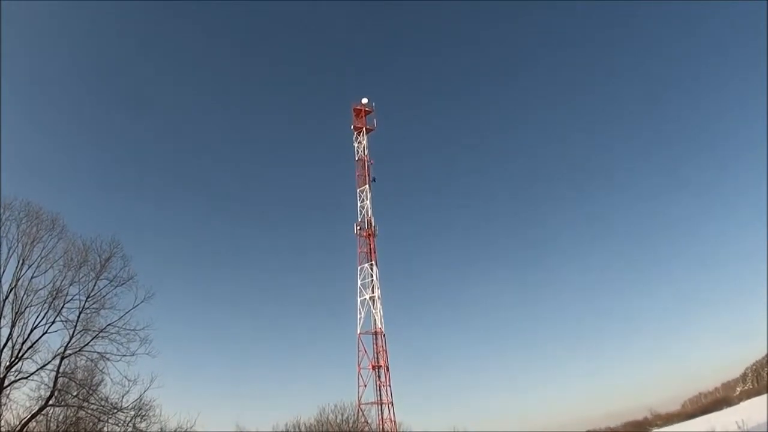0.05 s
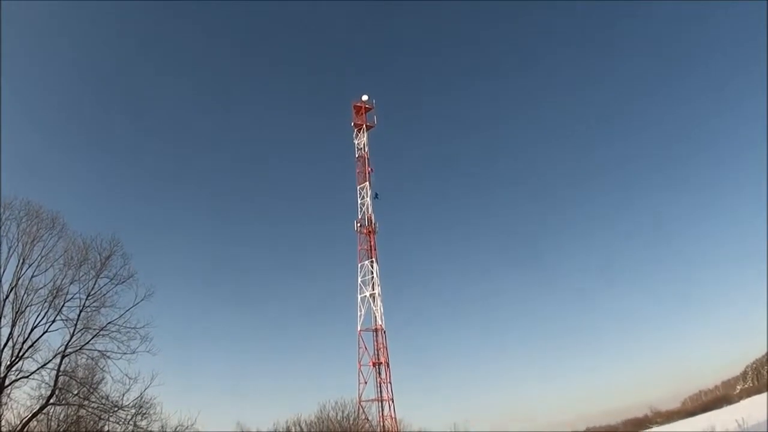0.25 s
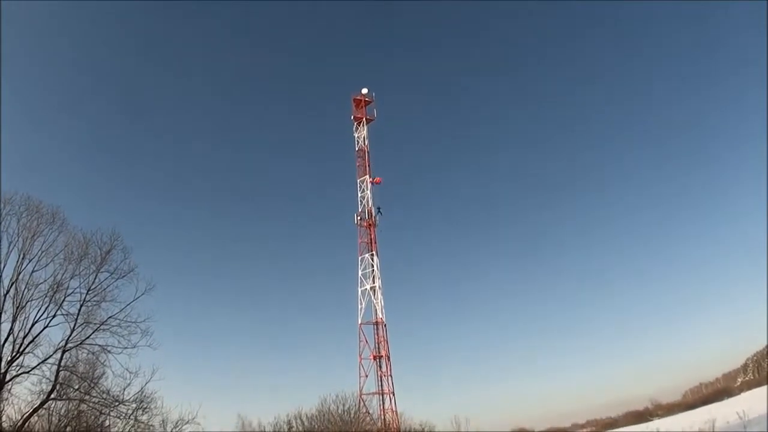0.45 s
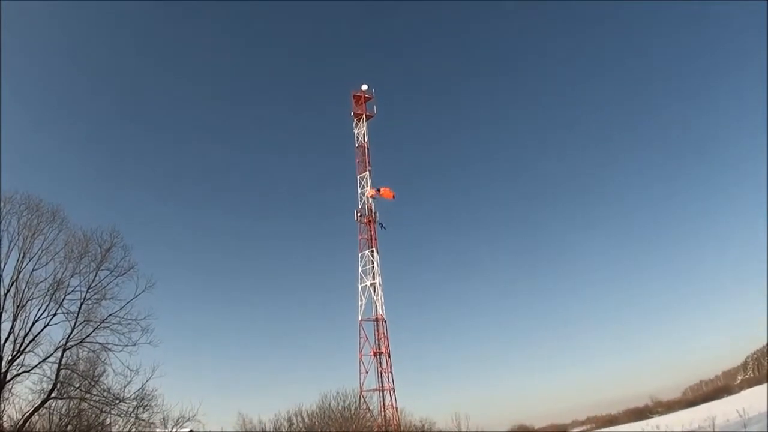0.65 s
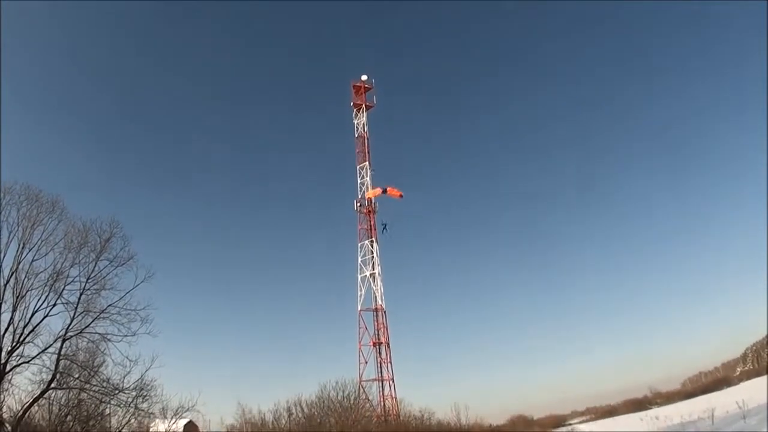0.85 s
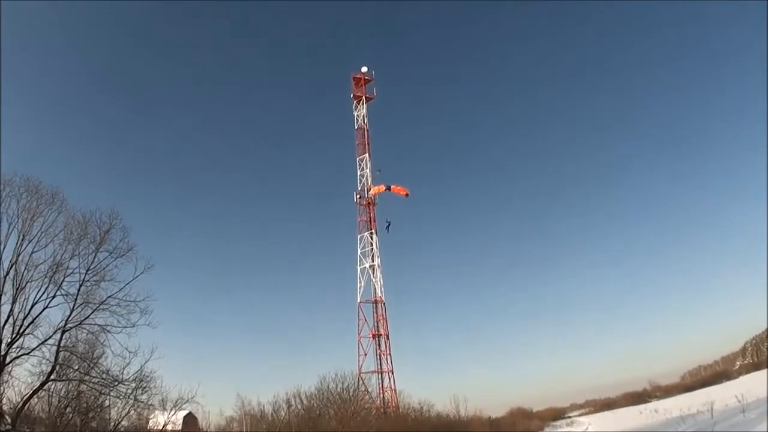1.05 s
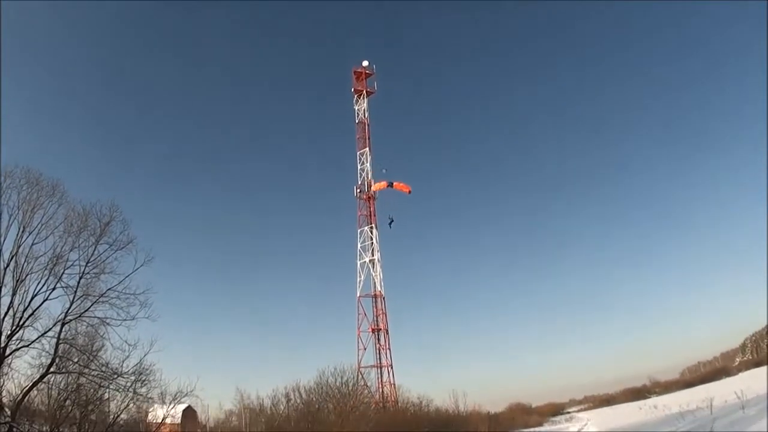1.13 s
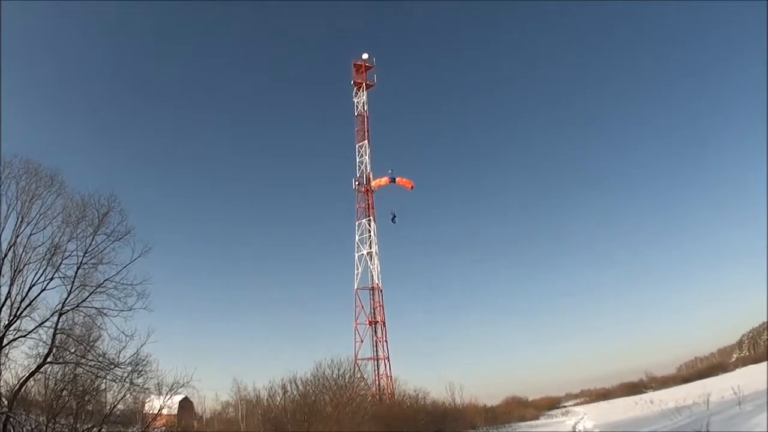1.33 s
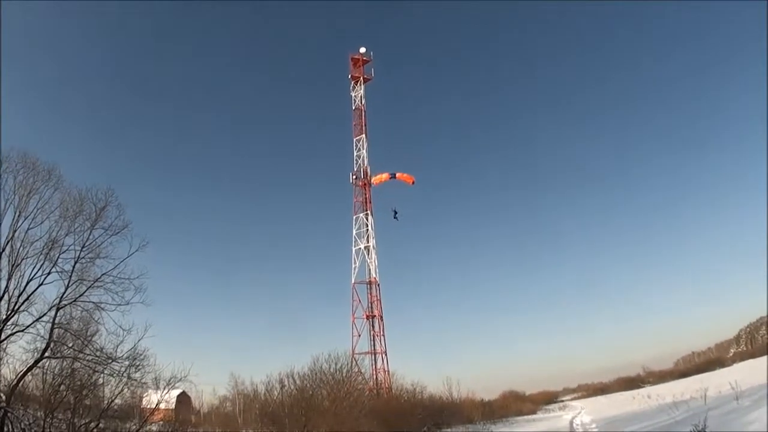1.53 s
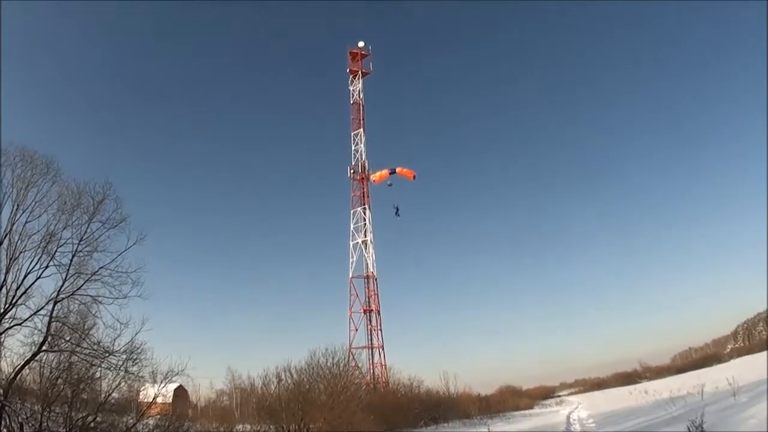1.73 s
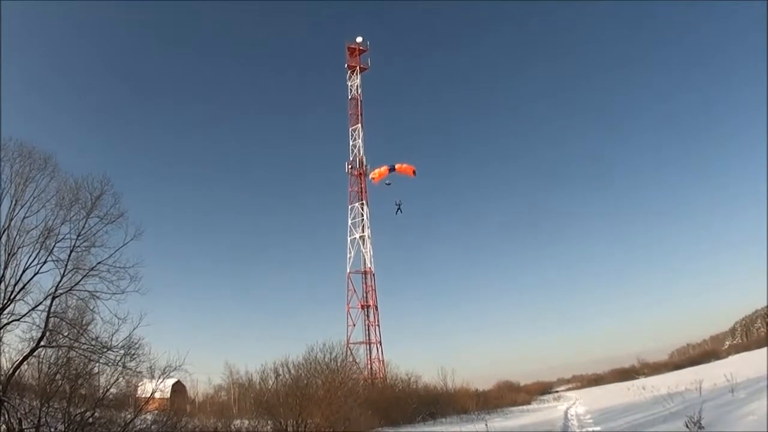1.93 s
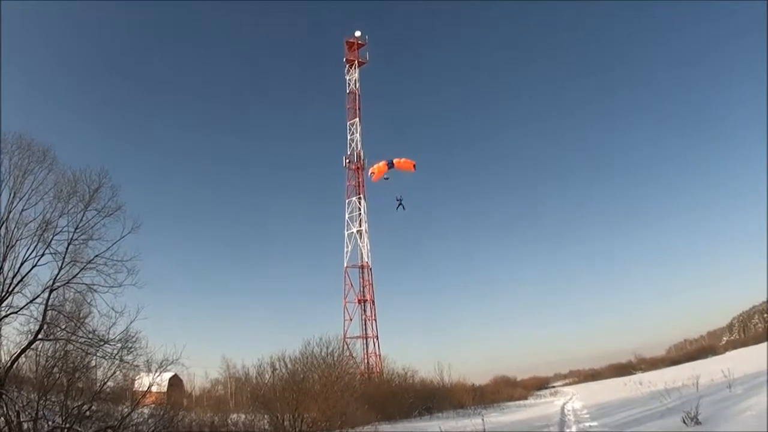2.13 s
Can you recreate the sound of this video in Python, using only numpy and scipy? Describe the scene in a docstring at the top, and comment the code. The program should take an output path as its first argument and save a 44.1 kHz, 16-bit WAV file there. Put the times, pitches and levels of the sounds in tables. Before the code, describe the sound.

Five close reflex camera shots around a distant parachute opening with a low, cracking cloth flutter

```python
"""Over a snowy field, beside a tall mast, a parachute opens: its cloth flogs, cracks taut and flutters out.
Close to the microphone a reflex camera takes five pictures. In each, a motor whines and rattles, and
noise bursts and ringing tones make the mirror slap, the shutter curtains and the mirror's return.
The cloth is made of dense random pops, single low cracks, rustle and small bright snaps.
Trees scatter a little sound back, and faint open-air rumble and hiss, both filtered noise, lie underneath."""
import sys
import numpy as np
from scipy import signal
from scipy.fft import rfft, irfft
from scipy.io import wavfile

SR = 44100
rng = np.random.default_rng(int(sys.argv[2]) if len(sys.argv) > 2 else 0)


def digitize_waveform(pressure):
    """Quantize a signal to 16-bit integers and store it at the path in sys.argv[1].

    Rows of a 2-D input are taken as channels; values are limited to [-1, 1].
    """
    field = np.atleast_2d(pressure).T
    bounded = np.clip(field, -1, 1)
    quanta = np.round(bounded * 32767).astype(np.int16)
    wavfile.write(sys.argv[1], SR, quanta)


N = 97020  # samples, 2.2 s

# The pictures, timed by the rise of the mirror: start_s, level_db
PICTURES = [(0.2397, 0), (.5494, -1), (.8605, -3), (1.5102, -1.5), (1.8190, -1)]
# Blows of each camera part: delay_s after the mirror rises, level_db, body_ring_db
MIRROR_UP_BLOWS = [(0., -1.5, -4), (0.0096, -8.5, -3)]
CURTAIN_BLOWS = [(.027, -9.5, -18), (.033, 2.5, 1.5), (0.0442, 0, -0.5)]
MIRROR_DOWN_BLOWS = [(.1, -1, 3), (.107, -5, -6.5), (.112, -10, -30)]
# Tone colour of each kind of blow, relative levels: frequency_hz, level_db
MIRROR_UP_COLOUR = [(47, -40), (80, -20.5), (323, 8), (877, -13), (1250, -34.5), (1860, -12.5), (2490, -23),
                    (2840, -12), (3540, -12), (3960, -24), (4520, -13.5), (6590, -22), (8790, -13.5),
                    (12000, -33), (16000, -19)]
CURTAIN_BLOW_COLOUR = [(47, -111), (80, -44.5), (271, 8), (550, -16.5), (858, -8.5), (1630, -19.5),
                       (1860, -13.5), (2490, -15.5), (2900, -14.5), (3390, -15), (7200, -17), (8600, -11.5),
                       (9610, -14), (11500, -32.5), (16000, -35)]
MIRROR_DOWN_COLOUR = [(47, -9), (80, -9), (331, 1.5), (563, -18.5), (1050, -12), (1340, -20.5),
                      (1820, -4.5), (2380, -19.5), (3540, 2.5), (3960, -9), (5170, -10.5), (7360, -17),
                      (9190, -14), (12000, -34.5), (16000, -46)]
# Ringing tones, with the time to fade by 60 dB: pitch_hz, level_db, t60_s
BODY_TONES = [(274, -17, 0.061), (352, -36, 0.063), (589, -24.5, 0.035), (705, -27, .04),
              (832, -24.5, 0.046), (1027, -31, 0.062), (1733, -28.5, 0.063), (1942, -25.5, 0.032),
              (3250, -34, 0.065), (3570, -21, 0.056), (4450, -24, 0.048), (5160, -28, .04)]  # the camera body
MIRROR_THUMP_TONES = [(254, -4, 0.025), (437, -15.5, .012), (721, -14, 0.025)]  # the rising mirror slapping its stop
# Speed of the motor, as the rate at which gear teeth meet: time_s after the mirror rises, pitch_hz
MOTOR_SPEED = [(-.062, 900), (-.05, 1130), (-.043, 1450), (-.025, 2030), (-.015, 1540), (.015, 1480),
               (.05, 1480), (.062, 1750), (.076, 2050), (.086, 1920), (.099, 1720), (.112, 1750),
               (.12, 1905), (.138, 1925), (.155, 1975), (.169, 1930), (.185, 1750)]
# Loudness of the motor: time_s after the mirror rises, whine_db, rattle_db
MOTOR_EFFORT = [(-.062, -28, -24), (-.043, -3, -7), (-.027, -1.5, -4.5), (-.019, -6, 3.5), (.015, -1, -6.5),
                (.023, -20, -24), (.06, -13.5, -6.5), (.084, 1.5, 1.5), (.11, -1, -1.5), (.126, -2, -2.5),
                (.166, 0.5, -0.5), (.176, -17, -5), (.198, -40, -32.5)]
# Overtones of the whine: multiple of the gear-tooth rate, level_db
WHINE_OVERTONES = [(1, -41), (2, -37.5), (3, -32), (4, -43.5), (5, -62)]
# Tone colour of the gear rattle: frequency_hz, level_db
GEAR_RATTLE_COLOUR = [(59, -34), (100, -26.5), (224, 1), (295, -1.5), (502, -12.5), (872, -2), (1280, -14),
                      (1950, -3.5), (2520, -14), (3860, -4.5), (5300, -14.5), (5770, -6.5), (6840, -16),
                      (7940, -14.5), (10000, -14), (12100, -33), (16000, -46)]
# Loudness of the moving cloth: time_s, low_flogging_db, flutter_db
CANOPY_LEVELS = [(0.7, -28, -47), (0.706, -33.5, -40), (0.764, -29, -23.5), (0.792, -24, -28.5),
                 (0.856, -18, -19.5), (0.87, -12.5, -23.5), (0.908, -22, -20.5), (0.93, -25, -21.5),
                 (1.036, -26.5, -27.5), (1.054, -27, -19.5), (1.078, -27.5, -28.5), (1.182, -25.5, -29.5),
                 (1.252, -36.5, -38.5), (1.256, -40.5, -34), (1.392, -47, -45), (1.41, -37.5, -38.5)]
# Loudness of the canopy being dragged from its pack: time_s, level_db
PULL_LEVELS = [(.38, -56), (.47, -45), (.56, -37.5), (.66, -31), (.74, -40.5), (.8, -50)]
# Loudness of the cloth's rustle: time_s, level_db
RUSTLE_LEVELS = [(.66, -57), (.76, -33.5), (.84, -25.5), (.91, -24.5), (.99, -28.5), (1.05, -26),
                 (1.09, -32), (1.16, -32), (1.24, -42), (1.42, -50)]
# Low pops of panels pulling taut, levels before filtering: centre_s, level_db, length_s
PANEL_CRACKS = [(.801, -12, 0.0044), (.829, -9, 0.0028), (.851, -3.5, 0.0017), (.8545, -32, 0.001),
                (.866, -15, 0.0038), (0.879, -14, 0.0036), (0.8818, -5.5, 0.00424), (.909, -9, 0.0022),
                (0.913, -9, .0015), (1.037, -18, 0.00099), (1.127, -11, 0.0017), (1.161, -14, .003),
                (1.177, -9.5, 0.0035), (1.209, -22, 0.0019), (1.259, -18, .001)]
# Small bright snaps of the cloth, relative levels: start_s, level_db
CLOTH_SNAPS = [(.8422, 0), (0.9152, 1), (0.9494, -8), (.9938, -2), (1.0264, -3), (1.0414, 2.5),
               (1.0544, -8)]
# Tone colours of the cloth and of the open air: frequency_hz, level_db
CLOTH_COLOUR = [(24, -42), (40, 8), (80, -15), (199, 0), (293, -4.5), (374, -6.5), (408, -23.5),
                (478, -11.5), (654, -7.5), (739, -6.5), (961, -12), (1710, -14), (2600, -28), (3380, -42),
                (5720, -120)]
CLOTH_RUSTLE_COLOUR = [(1180, -39), (2000, -10), (2180, -3.5), (2620, -4.5), (3870, -2.5), (5830, -10.5),
                       (7570, -10.5), (11500, -31), (14400, -38), (16000, -38)]
AIR_COLOUR = [(15, -90), (25, -27), (92, -13.5), (127, -6), (206, -4.5), (317, -4), (476, -15.5),
              (591, -12.5), (641, -14), (1230, -22), (2690, -25.5), (6380, -28.5), (14000, -34),
              (16000, -36)]
# Stereo width: frequency_hz, side_minus_mid_db
CAMERA_SPREAD = [(100, -21), (400, -19.5), (700, -26), (1200, 2), (2300, -2), (4400, -8.5), (8000, -9),
                 (14000, -18)]
FAR_SPREAD = [(100, -37), (400, -19), (700, -20.5), (1300, -13), (3000, -10.5), (8000, -20), (14000, -50)]
# Stereo lean: frequency_hz, left_minus_right_db
CAMERA_LEAN = [(200, -1), (400, 0), (1200, -6.5), (4400, -4.5), (8000, -1.5), (14000, -0.5)]
FAR_LEAN = [(400, 0), (1300, -1.5), (2400, -1), (6000, 0.5)]

CONTACT_S = .0009  # a blow takes this long to build
MIRROR_TOP_HZ = 10800  # the rising mirror's blows are cut above this
CASE_HZ = 187  # the small camera radiates little below this
BUTTON_S, BUTTON_HZ, BUTTON_T60_S, BUTTON_DB = .1752, 1000, 0.013, -21.5
GEAR_DB = -29.5
SPIN_UP_WOBBLE, WHINE_WOBBLE = .04, 0.0094  # typical pitch wobble, as a share of the pitch
WHINE_FLICKER_DB, WHINE_FLICKER_HZ = 2, 116
SPLIT_HZ, RUSTLE_HZ = 495, 2270  # flogging below the first, flutter between, rustle above the second
SNAP_T60_S, SNAP_DB = 0.015, 0.5
CLOTH_LOW_HZ = 83  # the cloth radiates little below this
AIR_DB = -41.5
PORT_LAG_S = .000005  # the right microphone port hears sound this much later
TOP_HZ = 15800


def shutter():
    """The finger presses the button once; in each picture mirror and curtains strike and ring the body."""
    up = blows(MIRROR_UP_BLOWS, MIRROR_UP_COLOUR, db=10.5, low_hz=520,
               crack_t60=0.0049, crack_share=0.85, tail_t60=0.042, tail_db=3.5)
    up = cut(up, MIRROR_TOP_HZ, "low")
    curtains = blows(CURTAIN_BLOWS, CURTAIN_BLOW_COLOUR, db=8.5, low_hz=420,
                     crack_t60=0.016, crack_share=1.0, tail_t60=0.039, tail_db=-2)
    down = blows(MIRROR_DOWN_BLOWS, MIRROR_DOWN_COLOUR, db=11, low_hz=304,
                 crack_t60=0.015, crack_share=1.0, tail_t60=0.035, tail_db=-5.5)

    all_blows = MIRROR_UP_BLOWS + CURTAIN_BLOWS + MIRROR_DOWN_BLOWS
    body_ring = play(modes(BODY_TONES), [(delay, ring_db) for delay, _, ring_db in all_blows])
    ringing = play(body_ring + modes(MIRROR_THUMP_TONES), PICTURES)

    click = ring(BUTTON_HZ, BUTTON_T60_S) + 6 * cut(burst(0.026), 2300, "low", order=1)
    button = play(click, [(BUTTON_S, BUTTON_DB)])
    return cut(up + curtains + down + ringing + button, CASE_HZ, "high", order=2)


def blows(rows, points, db, low_hz, crack_t60, crack_share, tail_t60, tail_db):
    """One camera part strikes in every picture: a tick and short crack share the energy, then a tail rattles."""
    share = np.clip(crack_share, 0, 1)
    tick = np.sqrt(1 - share) * (clock() == 0)
    out = np.zeros(N)
    for delay, blow_db, _ in rows:
        for start, picture_db in PICTURES:
            crack = np.sqrt(share) * burst(crack_t60, CONTACT_S)
            tail = undb(tail_db) * burst(tail_t60, 2 * CONTACT_S)
            out += play(tick + crack + tail, [(start + delay - CONTACT_S, picture_db + blow_db)])
    return undb(db) * cut(colour(out, points), low_hz, "high", order=2)


def motor():
    """The motor spins up, slows as the mirror rises, then recocks the shutter; its gears whine and rattle."""
    whine, rattle_level = np.zeros(N), np.zeros(N)
    for start, picture_db in PICTURES:
        t = clock() - start
        # slack gears chatter until they take the load
        chatter = np.where(t < 0, SPIN_UP_WOBBLE, WHINE_WOBBLE)
        wobble = 1 + chatter * unit(cut(rng.standard_normal(N), 394, "low"))
        # adding up the wobbling pitch gives the phase of the whine
        phase = 2 * np.pi * np.cumsum(curve(MOTOR_SPEED, t) * wobble) / SR
        tone = sum(undb(part_db) * np.sin(multiple * phase) for multiple, part_db in WHINE_OVERTONES)
        flicker_db = WHINE_FLICKER_DB * unit(cut(rng.standard_normal(N), WHINE_FLICKER_HZ, "low"))
        whine += undb(picture_db + flicker_db) * swell(MOTOR_EFFORT, t) * np.sqrt(2) * tone
        rattle_level += undb(picture_db) * swell(MOTOR_EFFORT, t, axis=2)
    rattle = colour(rattle_level * grains(rate=5000, spread_db=3.5), GEAR_RATTLE_COLOUR)
    return whine + undb(GEAR_DB) * rattle


def canopy():
    """Cloth slides from its pack, flogs and flutters as dense pops; panels crack taut, fabric rustles and snaps."""
    t = clock()
    flog = colour(grains(rate=1200, spread_db=1.5), CLOTH_COLOUR)
    flog = unit(cut(flog, SPLIT_HZ, "low"))
    flutter = colour(grains(rate=2600, spread_db=4.5), CLOTH_COLOUR)
    flutter = unit(cut(cut(flutter, SPLIT_HZ, "high"), RUSTLE_HZ, "low", order=6))
    rustle = colour(grains(rate=2600, spread_db=4), CLOTH_RUSTLE_COLOUR)
    rustle = unit(cut(rustle, RUSTLE_HZ, "high"))

    out = undb(-0.36) * flog * swell(CANOPY_LEVELS, t)
    out += undb(0.24) * flutter * swell(CANOPY_LEVELS, t, axis=2)
    out += rustle * swell(RUSTLE_LEVELS, t)
    out += (flutter + undb(-2) * rustle) * swell(PULL_LEVELS, t)
    for centre, db, length in PANEL_CRACKS:
        # pressure jumps up, falls in a straight line below zero, and jumps back
        u = (t - centre) / (length / 2)
        pop = -u * (abs(u) < 1)
        out += undb(db) * cut(cut(pop, 1100, "low", order=2), 150, "high")
    snaps = sum(play(burst(SNAP_T60_S), [row]) for row in CLOTH_SNAPS)
    out += undb(SNAP_DB) * colour(snaps, CLOTH_RUSTLE_COLOUR)
    return cut(out, CLOTH_LOW_HZ, "high")


def trees(sound):
    """Trees scatter the duller part of a sound back as a weak, fading wash, different on each side."""
    dull = cut(sound, 4000, "low", order=1)
    return undb(-21) * np.array([signal.fftconvolve(dull, burst(0.32))[:N] for _ in range(2)])


def air():
    """Distant rumble and hiss: coloured noise whose level wavers a little."""
    waver = undb(0.77 * unit(cut(rng.standard_normal(N), 22, "low", order=2)))
    return undb(AIR_DB) * waver * colour(rng.standard_normal(N), AIR_COLOUR)


def undb(db):
    """Turn decibels into a gain."""
    return 10 ** (np.asarray(db) / 20)


def unit(x):
    """Scale a sound to an average (rms) level of 1."""
    return x / np.sqrt(np.mean(x ** 2))


def clock():
    """Time of each sample in seconds."""
    return np.arange(N) / SR


def curve(table, t, axis=1):
    """Read one column of a table over time, joining its points by straight lines."""
    rows = np.array(table, float)
    return np.interp(t, rows[:, 0], rows[:, axis])


def swell(table, t, axis=1):
    """Turn a level curve in dB into a gain that fades in before it and out after it, over 0.056 s."""
    edge = np.clip(np.minimum(t - table[0][0], table[-1][0] - t) / 0.056 + 1, 0, 1)
    return edge * undb(curve(table, t, axis=axis))


def gains(points):
    """Turn (Hz, dB) points into a gain for each frequency, joined along a pitch-like (log) scale."""
    rows = np.array(points, float)
    log_hz = np.log(np.fft.rfftfreq(N, 1 / SR) + 1)
    return undb(np.interp(log_hz, np.log(rows[:, 0]), rows[:, 1]))


def colour(x, points):
    """Give a sound a tone colour with a filter that never acts early; white noise keeps its power."""
    cepstrum = irfft(np.log(unit(gains(points))), N)
    # folding the cepstrum onto positive time makes the filter minimum-phase
    fold = np.r_[1, np.full(N // 2 - 1, 2), np.zeros(N - N // 2)]
    return irfft(rfft(x) * np.exp(rfft(cepstrum * fold)), N)


def cut(x, hz, kind, order=3):
    """Keep what lies below ("low") or above ("high") a frequency."""
    return signal.sosfilt(signal.butter(order, min(hz, .45 * SR), kind, fs=SR, output="sos"), x)


def play(sound, rows):
    """Start a copy of a sound at each (s, dB)."""
    out = np.zeros(N)
    for start, db in rows:
        i = int(round(max(start, 0) * SR))
        out[i:] += undb(db) * sound[:N - i]
    return out


def fade(t60):
    """Die away smoothly, dropping 60 dB in t60 seconds."""
    return np.exp(-np.log(1000) * clock() / t60)


def ring(hz, t60):
    """One struck tone dying away."""
    return np.cos(2 * np.pi * hz * clock()) * fade(t60)


def modes(rows):
    """Several ringing tones, each softened because the blow has a finite length."""
    return sum(undb(db) * cut(ring(hz, t60), 2 * hz, "low", order=1) for hz, db, t60 in rows)


def grains(rate, spread_db):
    """Random clicks of uneven size, about `rate` a second, with rms 1."""
    chance, size = rng.random(N), rng.standard_normal(N)
    sign = rng.choice([-1, 1], N)
    return unit((chance < rate / SR) * sign * undb(spread_db * np.clip(size, -2, 2)))


def burst(t60, attack=0.):
    """A puff of noise that swells and dies away, with total energy 1."""
    rise = np.clip((clock() + 1 / SR) / (abs(attack) + 1 / SR), 0, 1) ** 2
    puff = rng.standard_normal(N) * fade(t60) * rise
    return puff / np.sqrt(np.sum(puff ** 2))


def spread(x, width, pan, scatter_s):
    """Two microphone ports: the left hears it first, and nearby reflections make the sides differ."""
    scatter = rfft(np.roll(burst(scatter_s), int(SR * scatter_s / 10)))
    mid = rfft(x)
    # only the timing of the scatter is kept; the width table sets its level
    side = mid * gains(width) * scatter / (abs(scatter) + 1e-12)
    lead = np.exp(1j * np.pi * np.fft.rfftfreq(N, 1 / SR) * PORT_LAG_S)
    lean = np.sqrt(gains(pan)) * lead
    return irfft(np.array([mid * lean + side, mid / lean - side]), N)


def scene():
    """The camera close by, the canopy far off, a weak scatter from the trees, and the open air."""
    camera, far = shutter() + motor(), canopy()
    near_stereo = spread(camera, CAMERA_SPREAD, CAMERA_LEAN, scatter_s=0.023)
    far_stereo = spread(far + air(), FAR_SPREAD, FAR_LEAN, scatter_s=.07)
    return near_stereo + far_stereo + trees(camera + far)


def record(dry):
    """The microphone housing dulls a narrow band; the loudest peaks are rounded and the top is cut."""
    band = signal.lfilter(*signal.iirpeak(2550, 5, fs=SR), dry)
    heard = dry - 0.42 * band
    heard = heard / (1 + (heard / .95) ** 4) ** .25
    return signal.sosfilt(signal.ellip(8, .2, 70, TOP_HZ, fs=SR, output="sos"), heard)


dry = scene()
out = record(dry)
digitize_waveform(out)
```